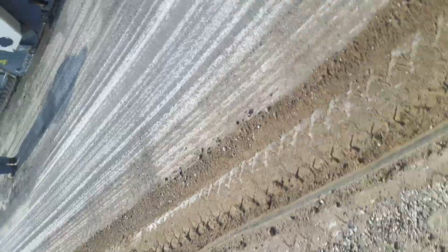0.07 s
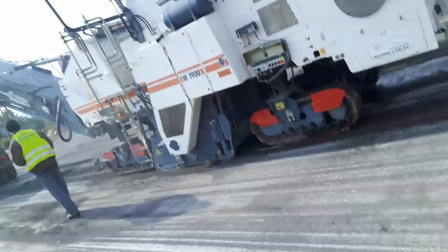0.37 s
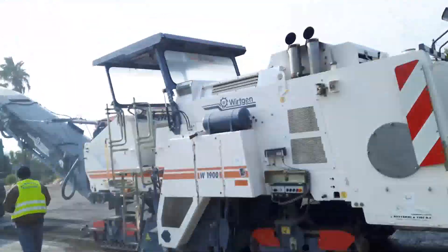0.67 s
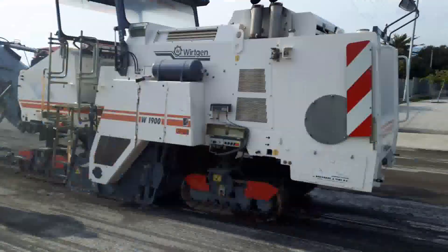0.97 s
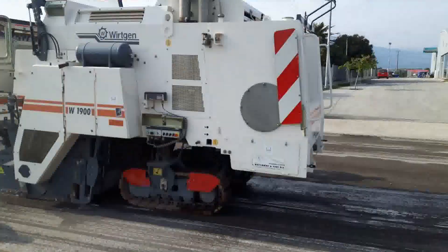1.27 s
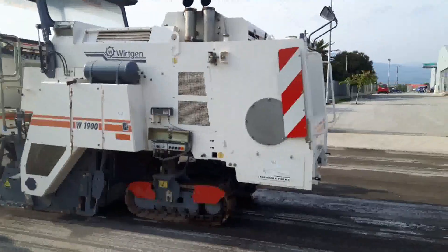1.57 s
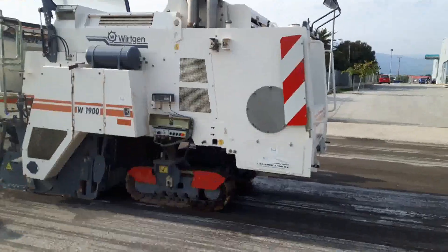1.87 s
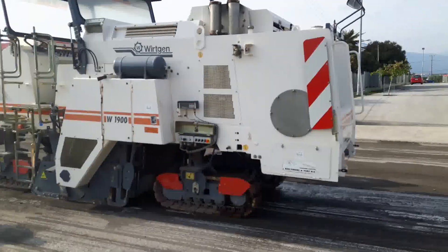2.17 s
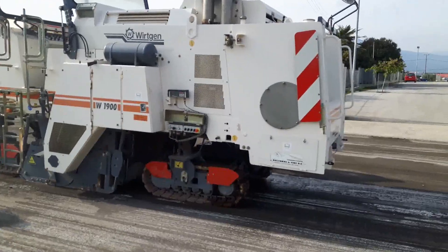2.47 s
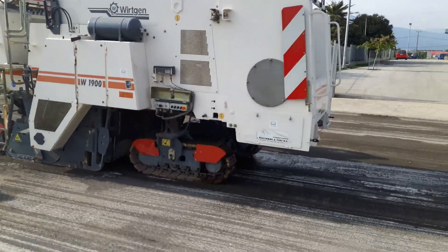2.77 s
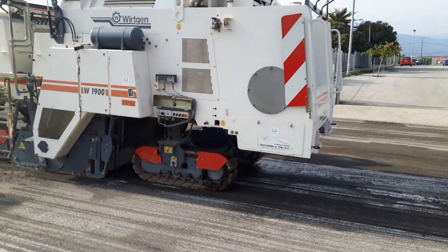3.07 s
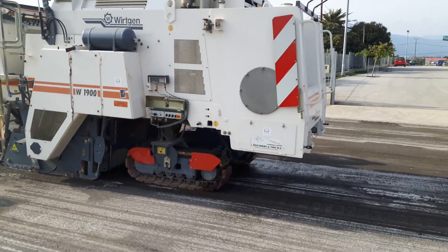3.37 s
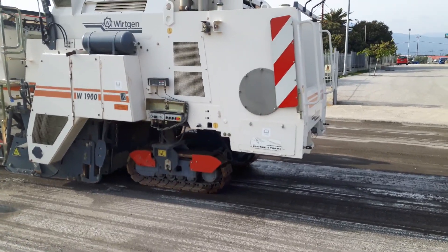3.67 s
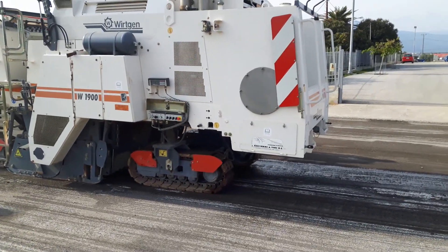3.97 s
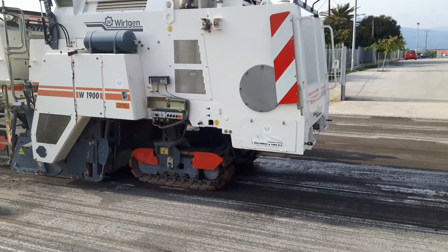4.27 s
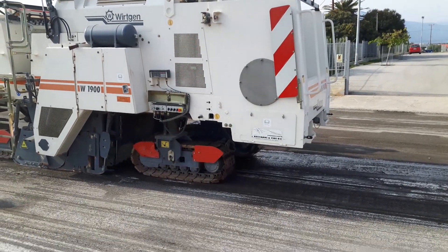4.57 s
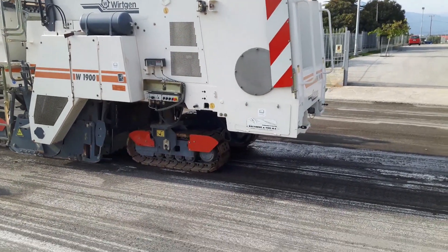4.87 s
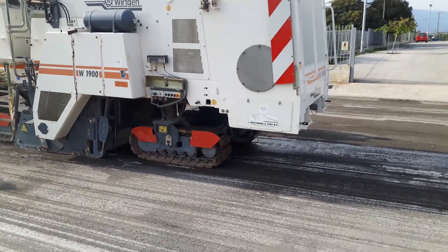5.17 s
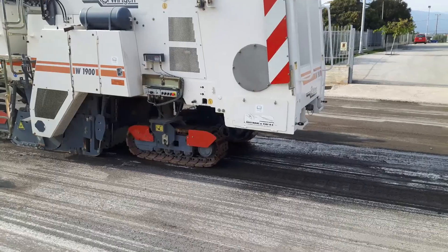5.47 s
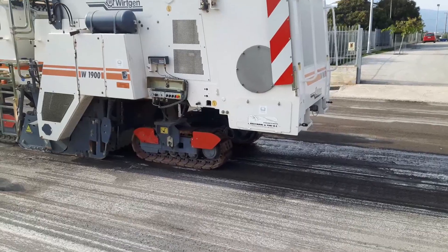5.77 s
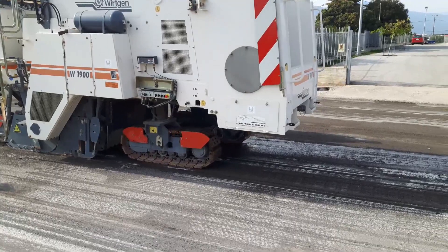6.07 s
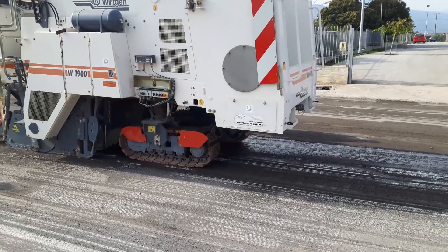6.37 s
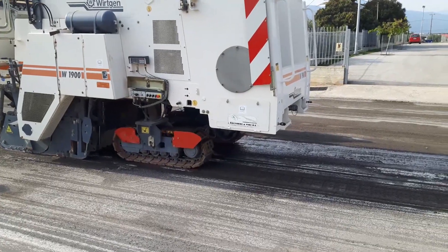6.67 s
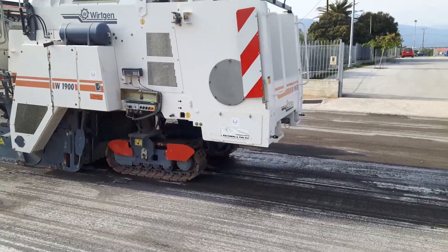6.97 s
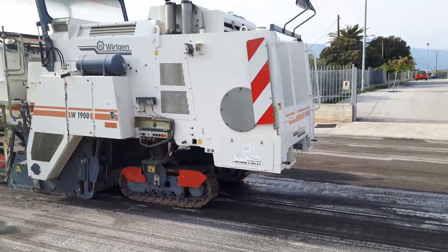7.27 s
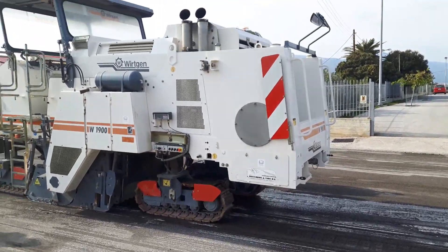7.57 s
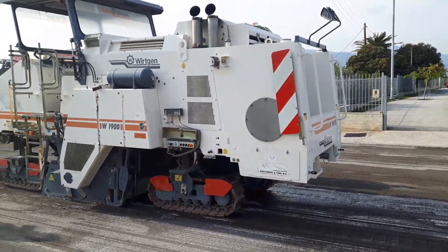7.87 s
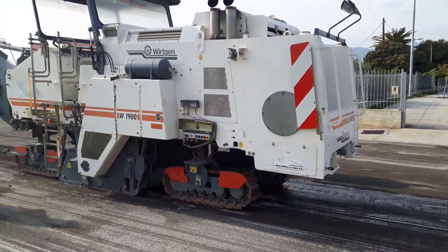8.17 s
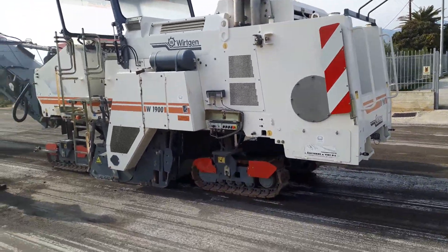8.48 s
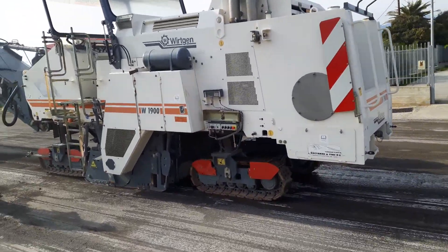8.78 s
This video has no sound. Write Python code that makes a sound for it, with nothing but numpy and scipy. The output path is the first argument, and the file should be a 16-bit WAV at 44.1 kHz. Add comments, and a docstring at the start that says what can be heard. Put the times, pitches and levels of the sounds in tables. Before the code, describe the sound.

After a brief silence, the sound fades in between about 0.4 and 0.7 seconds: a tracked road milling machine working in a street, a few metres from the microphone. Its big diesel drones and throbs to the end, with booming body panels and faint, steady pump whine. Above this, the drum crushes asphalt in a dense crunch and grit hisses on the housing. The engine eases slightly around 4.7 seconds as the drum digs in; grinding and hiss stay stronger until about 7 seconds, then settle back. Steel track links rub softly and dry pins give thin, high squeaks throughout, clustering from 4.6 to 7 seconds and again near 8.5. Stone chips tick irregularly, more clearly around 1.2, 3.4, 5.6 and 6.7 seconds. A light breeze rumbles faintly on the microphone, and the machine is still running at about 9 seconds.

```python
"""A street in a light breeze, one microphone a few metres from a creeping tracked road milling machine.
Its big governed diesel drones and throbs through the exhaust, over booming panels and whining pumps.
The drum's picks crush asphalt and bite harder for a while past the middle; grit hisses on the housing.
The steel track links rub, dry pins squeak, and stone chips tick. The sound fades in at the start."""
import sys
import numpy as np
from scipy import signal
from scipy.fft import rfft, irfft, next_fast_len
from scipy.io import wavfile
from scipy.ndimage import uniform_filter1d, minimum_filter1d

SR = 44100
rng = np.random.default_rng(int(sys.argv[2]) if len(sys.argv) > 2 else 0)


def inscribe(sig):
    """Save sig as 16-bit PCM at rate SR to the path in sys.argv[1].

    A 1-D sig is mono; a 2-D sig holds one channel per row.
    Samples are clipped to [-1, 1] before scaling.
    """
    pcm = np.round(np.clip(np.atleast_2d(sig).T, -1, 1) * 32767)
    wavfile.write(sys.argv[1], SR, pcm.astype(np.int16))


N = 397341
CYCLES_PER_S = 17.155   # four-stroke cycles of the diesel
BITE_START_S, BITE_END_S = 4.72, 7.04   # the drum starts to dig in, and to come free


def from_db(db):
    """Decibels to gain."""
    return 10 ** (np.asarray(db) / 20)


def unit_rms(x):
    """Scale to rms 1."""
    return x / np.sqrt(np.mean(x ** 2) + 1e-20)


def seconds():
    """Time of each sample."""
    return np.arange(N) / SR


def ramp(start_s, length_s):
    """Straight rise from 0 to 1."""
    return np.clip((seconds() - start_s) / length_s, 0, 1)


def curve(rows):
    """Join (time, value) points, sample by sample."""
    return np.interp(seconds(), *np.transpose(rows))


def noise():
    """White noise."""
    return rng.standard_normal(N)


def random_times(per_s):
    """Moments scattered at random through the scene."""
    return rng.uniform(0, N / SR, int(round(per_s * N / SR)))


def drift(rate_hz):
    """Smooth random wander of rms 1, mostly slower than rate_hz."""
    step, settle = 40, 2000
    pole = np.exp(-2 * np.pi * step * rate_hz / SR)
    kicks = rng.standard_normal(N // step + settle + 2)
    slow = signal.lfilter([1], [1, -2 * pole, pole * pole], kicks)[settle:]
    return np.interp(np.arange(N) / step, np.arange(len(slow)), unit_rms(slow))


def coloured(x, spectrum):
    """Shape x with a spectrum that falls 36 dB an octave beyond its ends; rms 1."""
    hz, db = np.transpose(spectrum)
    size = next_fast_len(N)
    octave = np.log2(np.maximum(np.arange(size // 2 + 1) * SR / size, 1))
    outside = np.abs(octave - np.clip(octave, np.log2(hz[0]), np.log2(hz[-1])))
    gain = from_db(np.interp(octave, np.log2(hz), db) - 36 * outside)
    return unit_rms(irfft(rfft(x, size) * gain, size)[:N])


def grains(per_s, spread_db):
    """Random tiny impacts, many small and a few large; rms 1."""
    sizes = from_db(spread_db * np.minimum(rng.exponential(1, N), 4))
    return unit_rms((rng.random(N) < per_s / SR) * sizes * rng.choice([-1, 1], N))


def bite(attack_s=0.24, release_s=0.2):
    """How hard the drum bites: 0 in a light cut, 1 in a heavy one."""
    return ramp(BITE_START_S, attack_s) * (1 - ramp(BITE_END_S, release_s))


def coloured_by_bite(source, light, heavy):
    """Crossfade from the light spectrum to the heavy one as the drum digs in; rms 1."""
    load = bite()
    light_cut, heavy_cut = coloured(source(), light), coloured(source(), heavy)
    return unit_rms(np.sqrt(1 - load) * light_cut + np.sqrt(load) * heavy_cut)


def creep_db(db_per_s):
    """The level at the microphone rises as the machine creeps on; 0 dB at mid-scene."""
    return db_per_s * (seconds() - N / SR / 2)


def engine_cycles(hunt_per_s, hunt_period_s):
    """Cycles turned so far; the governor hunts slowly around its set speed."""
    hunting = hunt_per_s * np.cos(2 * np.pi * seconds() / hunt_period_s)
    return np.cumsum(CYCLES_PER_S - hunting) / SR


def firing(cycle, depth_db, lope_db, cylinders=6):
    """Gain that pulses at the firing rate; some cylinders hit harder than others."""
    turn = 2 * np.pi * cycle
    uneven = sum(np.cos(k * turn + k * k) for k in range(1, cylinders - 1))
    return unit_rms(from_db(depth_db * np.cos(cylinders * turn) + lope_db * uneven))


# how hard the diesel works: t/s, level/dB
ENGINE_EFFORT = [(.6, -1.8), (1.9, 1.1), (4.0, .5), (4.8, -2.5), (5.4, 0.5), (9, 0.1)]

def effort_db(share=1):
    """A source follows its share of the engine's effort, which eases off just before the bite."""
    return share * curve(ENGINE_EFFORT)


# exhaust lines: multiple of the cycle rate, relative level/dB
EXHAUST_LINES = [(3, -38.5), (4, -47), (5, -23), (6, -50), (8, -27), (9, -15.5), (10, -20.5), (11, -18),
                 (12, -26.5), (13, -19), (15, -46.5), (16, -41), (17, -38.5), (18, -32), (19, -37.5),
                 (20, -38.5), (21, -37), (22, -34), (23, -36), (26, -42.5), (30, -38.5), (32, -44.5),
                 (33, -42.5), (34, -46.5), (36, -50)]
# boost of the line between the two loudest, which beats with them once a cycle: t/s, level/dB
THROB = [(2.4, 0), (2.95, -8), (3.3, 1), (4.1, 3), (4.5, -9), (5.5, -12), (6, -1)]

def exhaust(cycle, waver, flutter, bark_db, throb_multiple):
    """The silencer smears each blast in time and the hot gas makes the lines waver; rms 1."""
    throb_db, load = curve(THROB), bite()
    out = 0
    for multiple, db in EXHAUST_LINES:
        smear = .76 * multiple ** 2
        phase = 2 * np.pi * multiple * cycle + smear
        if multiple == throb_multiple:
            db = db + throb_db
        if multiple <= throb_multiple / 2:
            db = db + bark_db * (load - .5)   # the deepest lines swell under load
        unsteady = 1 if multiple >= throb_multiple else .3   # long waves are disturbed less
        swell = 1 + waver * unsteady * drift(1.46)
        phase_wobble = flutter * unsteady * drift(1.85)
        out = out + from_db(db) * (swell * np.cos(phase) + phase_wobble * np.sin(phase))
    return unit_rms(out)


# spectra of the body panels, from beside the machine: f/Hz, relative level/dB
PANEL_RUMBLE = [(70, -9.5), (112, -7), (135, -0.5), (165, -1), (205, 3), (245, 1), (275, -3.5), (340, -19)]
PANEL_ROAR = [(150, -2.5), (250, -2.5), (310, 0), (385, 0), (440, -7), (490, -5.5), (560, -4), (660, -6),
              (820, -6.5), (930, -14.5), (1200, -28), (2500, -60)]

def body(cycle, rumble_db, roar_db, bite_db, surge_db):
    """Panels boom and roar with the same shaking, in small surges; the roar slowly grows."""
    shaking = from_db(effort_db(share=.45) + bite_db * bite() + surge_db * drift(3.1))
    rumble = from_db(rumble_db) * coloured(noise(), PANEL_RUMBLE)
    pulsing = noise() * firing(cycle, depth_db=0.3, lope_db=0.5)
    roar = from_db(roar_db + creep_db(0.23)) * coloured(pulsing, PANEL_ROAR)
    return shaking * (rumble + roar)


# pump and gear tones at the microphone: f/Hz, level/dB
GEAR_TONES = [(326, -34), (635, -40), (1097, -44), (1216, -47), (1850, -54), (1987, -51), (3616, -60.5)]

def whines(cycle, stray_hz):
    """Pumps and gears follow the crankshaft, with a little play."""
    shaft_s = cycle / CYCLES_PER_S
    out = 0
    for hz, db in GEAR_TONES:
        play = stray_hz * np.cumsum(drift(12.2)) / SR
        out = out + from_db(db) * np.sin(2 * np.pi * (hz * shaft_s + play))
    return np.sqrt(2) * out


# spectra of the drum in the road, light cut and heavy cut: f/Hz, relative level/dB
LIGHT_CUT = [(500, -32), (900, 1.5), (1150, 1.5), (1400, 0.5), (1650, 0), (2000, -3), (2500, -6.5),
             (3100, -13), (3500, -13.5), (4000, -14), (4600, -25), (8000, -42)]
HEAVY_CUT = [(500, -11), (800, 1.5), (1050, -0.5), (1400, 0), (1800, 0), (2100, -4.5), (2500, -9.5),
             (3100, -18.5), (3700, -26), (4600, -21), (8000, -32)]

def drum(cycle):
    """Picks crush asphalt in a dense crunch, mixed with the diesel's knock."""
    knock = firing(cycle, depth_db=-0.3, lope_db=0.13) * from_db(.5 * drift(17))
    crunch = lambda: (noise() + 0.77 * grains(per_s=2500, spread_db=1.5)) * knock
    return coloured_by_bite(crunch, LIGHT_CUT, HEAVY_CUT)


# spectra of grit on the housing, light cut and heavy cut: f/Hz, relative level/dB
LIGHT_GRIT = [(2500, -33), (4200, -5.5), (4700, -7.5), (5450, -3.5), (6100, -8), (7000, -4.5), (9350, -7),
              (13200, -4.5), (14800, 4), (15700, -1)]
HEAVY_GRIT = [(2500, -35), (4200, -5.5), (4650, -11), (5050, -1.5), (6000, 0), (6600, -6.5), (7300, -11),
              (8050, -2), (10600, -9.5), (11800, -1.5), (13300, -1.5), (14800, 3), (15700, 3.5)]

def grit(cycle):
    """Crumbs and spray shower the housing in quick flurries, shaken by the engine."""
    flurry = firing(cycle, depth_db=1.5, lope_db=0.5) * from_db(0.92 * drift(25))
    shower = lambda: (noise() + 0.4 * grains(per_s=3000, spread_db=4.0)) * flurry
    return coloured_by_bite(shower, LIGHT_GRIT, HEAVY_GRIT)


def cutter(cycle, grind_db, grind_bite_db, grit_db, grit_bite_db):
    """Grinding follows the bite at once; loose grit takes longer to pile up and to clear."""
    uneven_asphalt_db = 0.85 * drift(1.6)
    shared_db = effort_db(share=0.68) + creep_db(0.22) + uneven_asphalt_db
    pile = bite(attack_s=0.71, release_s=0.76)
    grinding = from_db(grind_db + grind_bite_db * bite() + shared_db) * drum(cycle)
    hiss = from_db(grit_db + grit_bite_db * pile + shared_db) * grit(cycle)
    return grinding + hiss


# spectrum of the breeze on the microphone: f/Hz, relative level/dB
MIC_WIND = [(18, -32), (26, -13), (35, -4), (47, -5), (62, -5), (100, -9)]

def breeze(level_db, gust_db):
    """Light gusts rumble on the microphone."""
    return from_db(level_db + gust_db * np.tanh(drift(5.6))) * coloured(noise(), MIC_WIND)


# pitches at which the track links ring: f/Hz
LINK_MODES = [3670, 5000, 5340, 7040, 7870, 10100, 11700]

def rubbing_links(width_hz, swell_db):
    """Steel links rub all the time; each of their modes whispers and swells on its own; rms 1."""
    out = 0
    for hz in LINK_MODES:
        ringing = signal.lfilter(*signal.iirpeak(hz, hz / width_hz, fs=SR), noise())
        out = out + ringing * from_db(swell_db * np.minimum(drift(1.7), 1.5))
    return unit_rms(out)


def faint_slips(per_s, typical_s, spread, level_db, rough):
    """Squeak rows for short random slips of the pins, each near one of the link modes."""
    rows = []
    for start_s in random_times(per_s):
        length_s = typical_s * rng.uniform(.5, 1.5)
        hz = rng.choice(LINK_MODES) * (1 + spread * rng.normal())
        rows.append((start_s, length_s, hz, level_db, rough))
    return rows


# the main track squeaks at the microphone: t/s, length/s, starting f/Hz, level/dB, roughness 0-1
PIN_SQUEAKS = [(1.08, 0.084, 7400, -57, .1), (1.1, 0.22, 10770, -59, .2), (1.2, .12, 4330, -54, .15),
               (1.56, .13, 6400, -59, .15), (2.91, .13, 10630, -52, .15), (3.04, .17, 10980, -60, .2),
               (3.05, .15, 5500, -57, .1), (3.88, .2, 7170, -51, .05), (4.6, .5, 10330, -56, .25),
               (4.62, .55, 11400, -54, .9), (4.66, 0.27, 6800, -54, .6), (4.68, .3, 9200, -54, .9),
               (4.8, 0.67, 5200, -55, .2), (4.93, .21, 2190, -39.5, .4), (5.6, 0.72, 12000, -52, .8),
               (6.5, .68, 5200, -55, .35), (6.86, .12, 10600, -49, .6), (7.47, 0.33, 10080, -58.5, .4),
               (7.88, 0.15, 7040, -52.5, .1), (8.52, 0.49, 9200, -53.5, .9), (8.52, 0.49, 6980, -52, .1)]

def squeaks(faint_rows, warble_hz, jitter_hz, flicker_db):
    """Dry track pins stick and slip: a thin gliding tone that warbles and breaks up when rough."""
    out, flicker, load = np.zeros(N), drift(22), bite()
    stray_hz = warble_hz * drift(24.6) + jitter_hz * drift(200)
    glide_per_s = 0.049 * (1 - load) - 0.029 * load   # pitch rises in a light cut, sags under load
    for start_s, length_s, start_hz, db, rough in PIN_SQUEAKS + faint_rows:
        at = np.arange(int(start_s * SR), min(int((start_s + length_s) * SR), N))
        along = np.clip((at / SR - start_s) / length_s, 0, 1)
        own = (at + rng.integers(N)) % N   # every pin slips in its own way
        hz = start_hz * (1 + np.cumsum(glide_per_s[at]) / SR) + rough * stray_hz[own]
        arch = np.sqrt(np.pi * np.abs(np.sin(np.pi * along)))
        gain = from_db(db + flicker_db * np.sqrt(rough) * flicker[own])
        out[at] += arch * gain * np.sin(2 * np.pi * np.cumsum(hz) / SR)
    return out


# the largest stones striking the housing: t/s, starting level/dB
STONE_HITS = [(1.1875, -36), (2.555, -40), (3.43, -35), (4.0694, -38.5), (5.572, -34), (6.679, -37),
              (7.0307, -38)]
# spectrum of their crack: f/Hz, relative level/dB
STONE_CRACK = [(1500, -10), (3300, -1), (5300, 3), (7500, 1), (10000, 2), (15000, -2)]

def chips(t60_s, small_per_s, small_db):
    """Stones crack against steel and die at once; smaller ones come at random."""
    t, envelope = seconds(), np.zeros(N)
    crack = coloured(noise(), STONE_CRACK)
    small_hits = [(start_s, small_db) for start_s in random_times(small_per_s)]
    for start_s, db in STONE_HITS + small_hits:
        at = int(start_s * SR)
        envelope[at:] += from_db(db - 60 * np.minimum(t[:N - at] / t60_s, 4))
    return envelope * crack


def scene():
    """Engine, cutter and tracks in mono, from a few metres away in the street."""
    cycle = engine_cycles(hunt_per_s=.035, hunt_period_s=1.32)
    drone = exhaust(cycle, waver=0.21, flutter=0.14, bark_db=2.0, throb_multiple=10)
    drone *= from_db(-10.5 + effort_db())
    panels = body(cycle, rumble_db=-19, roar_db=-22.5, bite_db=0.16, surge_db=0.55)
    gears = whines(cycle, stray_hz=3.08)
    milling = cutter(cycle, grind_db=-31.5, grind_bite_db=4, grit_db=-41, grit_bite_db=3.5)
    wind = breeze(level_db=-37, gust_db=2.7)
    links = from_db(-56.5) * rubbing_links(width_hz=90, swell_db=4.0)
    slips = faint_slips(per_s=2, typical_s=0.17, spread=0.023, level_db=-56, rough=.25)
    pins = squeaks(slips, warble_hz=130, jitter_hz=130, flicker_db=5.0)
    stones = chips(t60_s=0.071, small_per_s=2.6, small_db=-41.5)
    return (drone + panels + gears + milling + wind + links + pins + stones)[None]


def limiter(x, top, hold_s):
    """Turn the gain down just around any peak that would pass the top."""
    size = int(hold_s * SR)
    gain = minimum_filter1d(np.minimum(1, top / (np.abs(x) + 1e-9)), size)
    return x * uniform_filter1d(gain, size)


def record(dry):
    """The microphone signal fades in, peaks are held under full scale, the highest treble is cut."""
    faded = dry * ramp(start_s=0.37, length_s=0.32)
    held = limiter(faded, top=0.83, hold_s=0.016)
    lowpass = signal.ellip(12, .1, 90, 15800, fs=SR, output="sos")
    return signal.sosfilt(lowpass, held)


dry = scene()
out = record(dry)
inscribe(out)
```